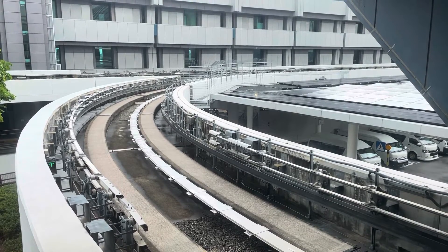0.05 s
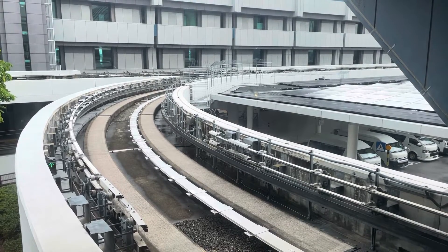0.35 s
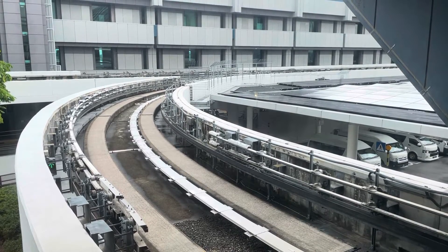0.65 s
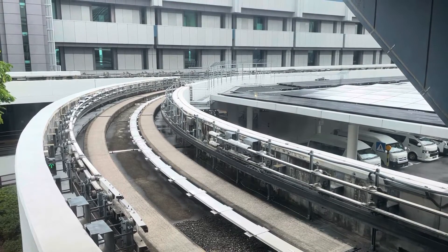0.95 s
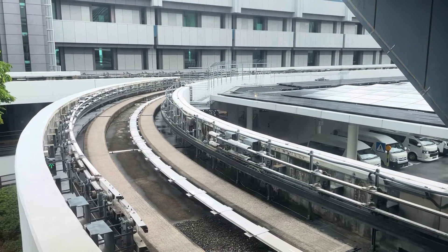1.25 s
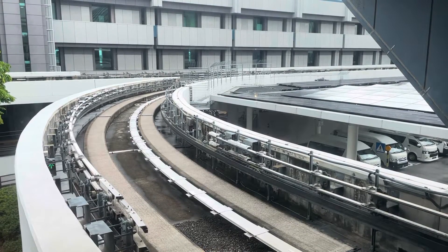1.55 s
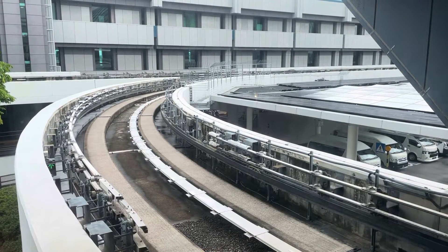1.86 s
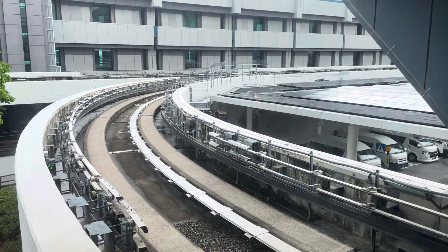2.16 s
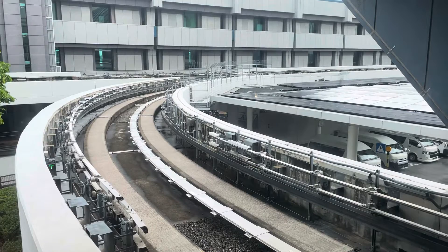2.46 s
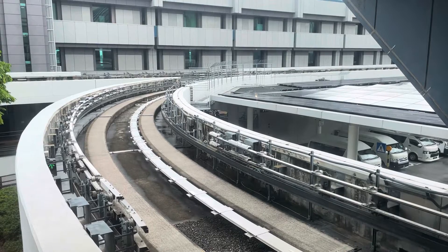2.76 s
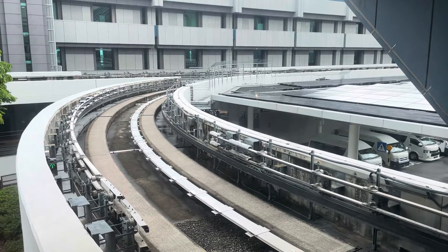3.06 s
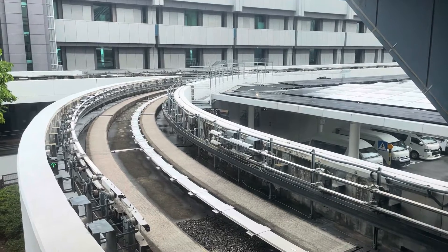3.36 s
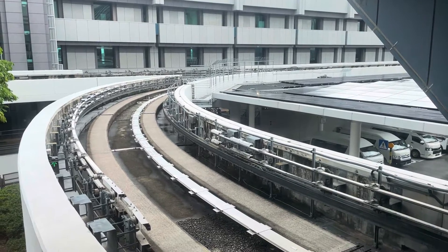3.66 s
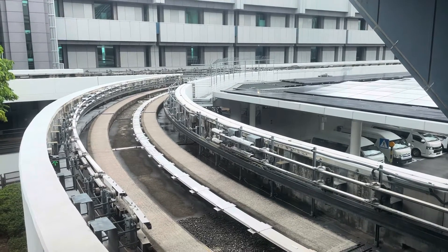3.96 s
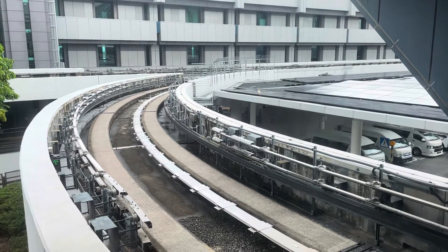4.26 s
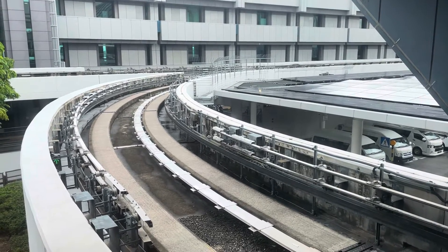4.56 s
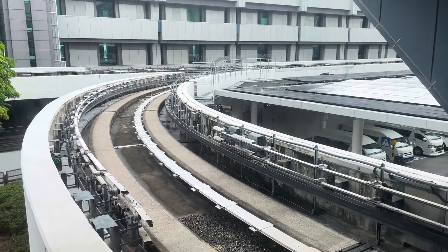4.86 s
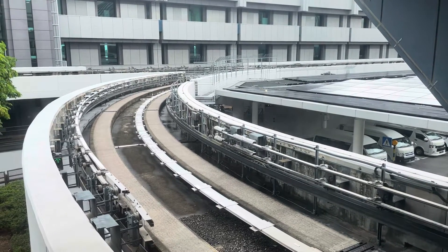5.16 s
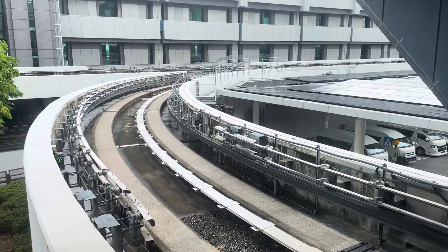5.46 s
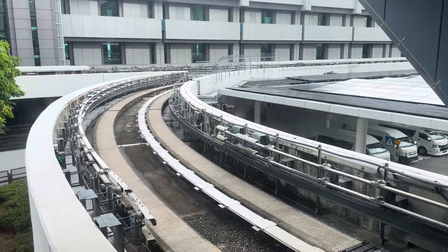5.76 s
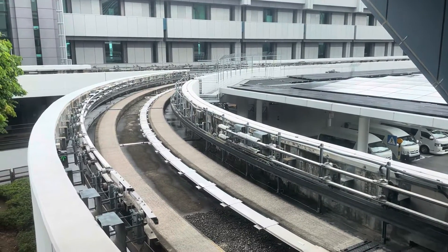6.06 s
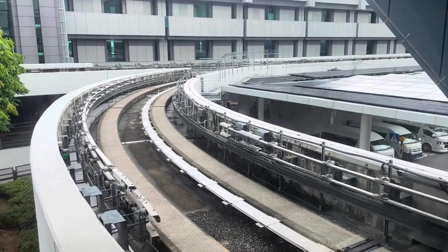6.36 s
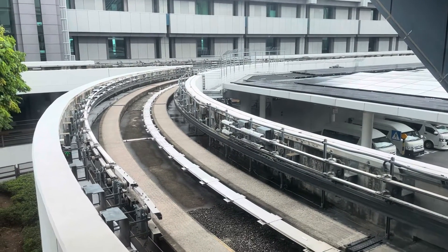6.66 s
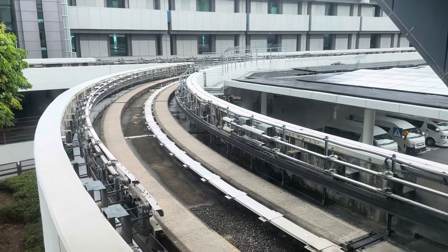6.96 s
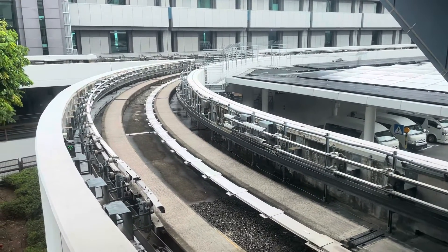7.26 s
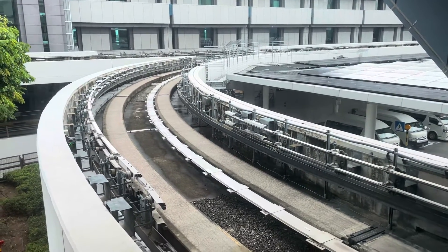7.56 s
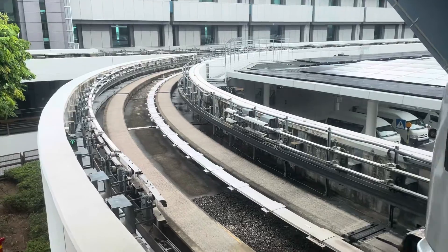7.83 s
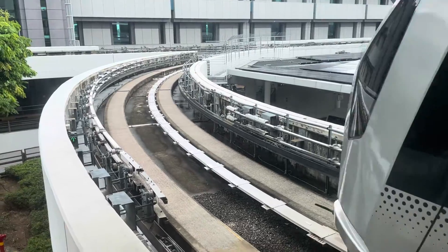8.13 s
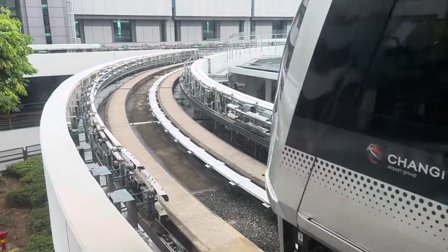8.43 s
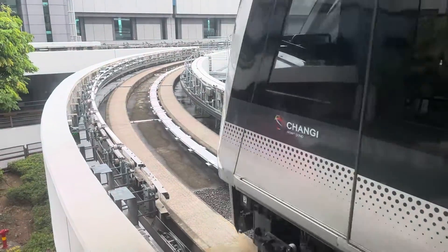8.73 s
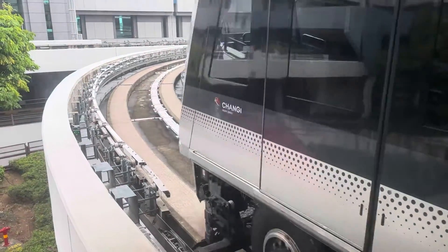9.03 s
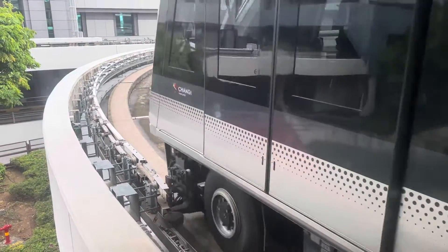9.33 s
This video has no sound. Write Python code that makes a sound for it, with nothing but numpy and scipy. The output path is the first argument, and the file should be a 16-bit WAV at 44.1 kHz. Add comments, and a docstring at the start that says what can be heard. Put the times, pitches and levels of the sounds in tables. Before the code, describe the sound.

Station fans rumble throughout outdoors, with a slowly swelling low hum, soft far traffic and a very faint, thin electric whistle. At about 0.2 seconds a distant valve gives a short, slightly whistling puff of air. A longer hiss of compressed air starts near 2.9 seconds, sags and fades by 5. A few tiny ticks sound nearby at 4.7. From about 5 seconds a rubber-tyred shuttle train approaches: its tyres roar on concrete, its gears give a throbbing mid-pitched whine, and its motor hums in surges, strongest around 7. From about 7 seconds its power pickups rub along the rails with a growing dry sizzle and thin, high ringing squeals. From 8 seconds the train passes close, the deck booming and the axles thrumming in low pulses, and it is still rolling by at the end, near 9.4 seconds.

```python
"""A rubber-tyred shuttle train rolls in along a curved concrete track and passes close by.
As it nears, its tyres roar, the deck booms under its weight, its gears whine, its motor hums,
and its collector shoes (the pads that pick up power) rub and sing on the power rails.
Before that, compressed air is let off twice in the distance, and a few tiny ticks sound nearby.
Station fans rumble throughout, with a low hum, a thin electric whistle and far traffic."""
import sys
import numpy as np
from scipy import signal
from scipy.fft import irfft, next_fast_len
from scipy.io import wavfile

SR = 44100
rng = np.random.default_rng(int(sys.argv[2]) if len(sys.argv) > 2 else 0)


def waveform_to_disk(signal):
    """Save audio, clipped to [-1, 1], as 16-bit WAV at the path in sys.argv[1]."""
    frames = np.transpose(np.atleast_2d(signal))
    scaled = np.clip(frames, -1, 1) * 32767
    samples = np.round(scaled).astype(np.int16)
    wavfile.write(sys.argv[1], SR, samples)


N = 414231
TIME = np.arange(N) / SR
TOP_HZ = 13800  # the sound is cut off above this

# A spectrum says how strong low and high pitches are compared with each other.
# A swell is strongest at peak_s and is down to about a third half_s before and after.
# the car's approach, and how it comes out from behind a building
SPEED_M_PER_S, CLOSEST_M = 4.45, 6.7
HIDDEN_DB, EMERGE_S, EMERGE_SPREAD_S = -35, 4.73, 0.22
# tyres on concrete: pitch_hz, strength_db
TYRE_SPECTRUM = [(150, -1), (400, -9), (720, 1), (1000, -3), (1400, -4), (1750, -10), (2500, -11),
                 (4000, -29), (6000, -43), (8000, -53), (9700, -35), (13500, -58.5)]
# the deck booming under the car's weight: pitch_hz, strength_db
DECK_SPECTRUM = [(15, -34.5), (30, -17), (45, -8), (58, 0.5), (70, 6.5), (85, -0.5), (125, -3), (190, -1.5),
                 (300, -31), (3000, -100)]
# tyres and body thrumming as the nose and axles arrive: peak_s, half_s, pitch_hz, level_db
AXLE_THRUMS = [(8.177, 0.11, 133.1, -30.5), (8.338, 0.17, 101, -29), (8.451, .07, 51, -26.5),
               (8.464, 0.071, 149.2, -30.5), (8.662, 0.064, 51, -25), (8.819, 0.047, 129.2, -25.5),
               (8.968, .12, 59.7, -24.5), (9.208, 0.065, 62, -26)]

# the note of the gears: time_s, pitch_hz
GEAR_PITCH = [(0, 869), (6, 859.5), (7, 856.3), (8, 858.3), (8.7, 859.5), (9.39, 849)]
# uneven throbs in the gear whine: peak_s, half_s, pitch_hz, strength_db
GEAR_THROBS = [(5.34, 0.043, 862, -53.5), (6.02, 0.053, 858, -48.5), (6.18, .04, 858, -46),
               (6.36, 0.08, 858, -41), (6.48, 0.047, 862, -48.5), (6.697, 0.05, 860, -51.5),
               (6.953, 0.062, 850, -45.5), (7.174, 0.043, 859, -43), (7.33, 0.045, 862, -47),
               (7.445, .04, 862, -48.5), (7.596, 0.032, 860, -41), (7.802, 0.046, 860, -45),
               (8.143, 0.04, 862, -43.5), (8.32, 0.05, 853, -42.5), (8.474, 0.049, 843, -48),
               (8.826, 0.073, 853, -45), (9.1, .06, 848, -48.5), (9.35, 0.057, 845, -47)]
# the motor surging in the curve: peak_s, half_s, level_db
MOTOR_SURGES = [(5.66, .08, -39.5), (6.02, 0.085, -39.5), (6.28, .16, -40), (6.71, 0.11, -33),
                (7.14, 0.15, -35.5), (7.42, .07, -39), (7.66, 0.065, -40), (7.96, .08, -44)]
# drones of the drive: multiple_of_gear_pitch, width_hz, peak_s, half_s, level_db
DRIVE_DRONES = [(0.421, 16, 7.08, 0.11, -37), (0.417, 20, 6.56, 1, -42), (0.519, 90, 6.9, 1.1, -46),
                (0.574, 7.4, 6.11, 0.4, -46), (.685, 10, 7.4, .7, -50), (.81, 200, 7.33, 0.17, -39.5),
                (.855, 30, 8.5, 0.7, -49.5), (.99, 54, 9, 0.36, -48), (1.661, 39, 8.5, 1.5, -56),
                (1.83, 90, 7.15, 0.6, -51)]

# notes that the shoes ring in the rails: pitch_hz, width_hz, strength_db, db_per_contact_db
RAIL_NOTES = [(1956, 90, -9, 1.5), (2094, 130, -4.5, 3), (2886, 310, 1, 1.46), (3134, 280, 0, 2.5)]
# shoes squealing as they press harder: peak_s, half_s, pitch_hz, glide_hz_per_s, width_hz, level_db
SHOE_SQUEALS = [(6.87, .13, 2820, 2, 50, -56), (7.72, .2, 3070, -0.5, 171, -52),
                (8.17, .13, 2084, 0, 50, -51), (8.7, 0.14, 3060, -0.5, 260, -47),
                (8.723, 0.14, 1990, 152, 90, -52), (9.02, .14, 3050, -300, 129.3, -47),
                (9.18, .25, 2100, 170.5, 55, -50), (9.268, 0.18, 2870, -200, 100, -53)]
# dry sizzle of the shoes: pitch_hz, strength_db
SIZZLE_SPECTRUM = [(1500, -26.5), (3200, -2.5), (3900, 3.5), (4500, 4.5), (5400, -0.5), (7000, -7.5),
                   (9500, -21.5), (11500, -24.5), (13500, -31)]
# faint fizz as the car comes into the open: pitch_hz, strength_db
FIZZ_SPECTRUM = [(1500, -44.5), (7500, -13), (9300, 5.5), (10300, -6.5), (11500, -14), (13500, -19)]

# a valve's short puff of air, and its bright top: pitch_hz, strength_db
PUFF_SPECTRUM = [(500, 8), (950, 5.5), (1600, 6.5), (3000, 0), (4200, -1.5), (5100, -2), (5900, 3.5),
                 (6500, -2), (7300, -3.5), (8400, -21), (10500, -20), (14000, -40)]
PUFF_TOP_SPECTRUM = [(500, -63), (7500, -30), (9200, 4.5), (10000, -1), (11000, -2), (12000, -9),
                     (12900, -7), (14000, -15.5)]
# faint sliding whistles during the puff: start_s, length_s, start_hz, end_hz, level_db
PUFF_WHISTLES = [(0.206, 0.17, 1005, 824, -43.5), (0.261, 0.127, 1280, 1464, -51.5)]
# a pipe's long release of air, and its bright top: pitch_hz, strength_db
VENT_SPECTRUM = [(600, -5), (1100, 5.5), (1700, 1.5), (2400, -4.5), (3500, -11), (4100, -12), (5000, -13),
                 (6200, -23.5), (7400, -23.5), (9000, -45.5), (13700, -59)]
VENT_TOP_SPECTRUM = [(600, -61), (8000, -37), (9100, 1.5), (9600, 3.5), (10000, -0.5), (10700, -11.5),
                     (11800, -25), (13800, -21)]
# notes at which the pipe and its nozzle ring: pitch_hz, width_hz, boost_db
PIPE_NOTES = [(2910, 340, 6), (3560, 140, 4.6), (5070, 110, 5), (5950, 260, 5)]
NOZZLE_NOTES = [(12600, 220, 9), (13600, 300, 9)]
# small ticks nearby: start_s, peak_db, pitch_hz, width_hz, decay_s
NEARBY_TICKS = [(4.699, -44, 10200, 1700, 0.0011), (4.7, -56, 7100, 700, .001),
                (4.7, -57, 13200, 1400, .001), (4.703, -60, 10200, 2000, 0.015),
                (4.707, -38, 2450, 600, 0.0012), (4.755, -44, 2250, 400, .003),
                (4.756, -62, 11000, 2400, .002)]

# rumble of the station's fans: pitch_hz, strength_db
RUMBLE_SPECTRUM = [(15, -25), (28, -15), (38, -13), (48, -3), (70, -5), (100, 1), (150, 1), (175, -1),
                   (250, -5.5), (340, -8.5), (430, -18), (700, -58), (4000, -100)]
# notes at which their ducts ring: pitch_hz, width_hz, boost_db
DUCT_NOTES = [(96.3, 4.4, 5), (114.5, 5.7, 5), (132.9, 5.3, 8.35), (141, 4, 1.8), (211.3, 21, 6.7),
              (243.3, 11, 2.8), (337.7, 9, 3.8)]
# low booms that swell up now and then in the rumble: pitch_hz, width_hz, peak_s, half_s, level_db
LOW_SWELLS = [(125.2, 45, 0.35, 0.18, -25), (213, 26, 1.01, 0.55, -31), (137.6, 7.1, 1.82, 0.11, -29),
              (215.4, 20, 2.386, 0.41, -32), (55, 29, 2, 0.57, -40), (133.5, 3.9, 4.305, 0.27, -24),
              (134.4, 10, 5.05, 0.46, -27), (213, 24.2, 4.8, .55, -33), (212, 13, 7.95, 0.26, -36),
              (191.8, 13, 8.7, .5, -35.5)]
# notes of a low hum: pitch_hz, base_db, waver_share, right_lag_rad, swell_share
HUM_TONES = [(48.9, -50.5, 0.4, 0.13, 1), (151.35, -32, 0.066, -0.04, 1), (213.2, -43, 0.6, -0.05, 1.28),
             (304.3, -38, 0.21, -0.11, 0.44), (489, -62, 0.73, -0.34, 1)]
# the hum swells slowly, dips as the car nears and returns as it passes: time_s, change_db
HUM_SWELL = [(0, -9), (.2, 4.5), (1, 4), (1.7, 1), (2.5, 6), (3, 1.5), (3.6, 3), (5, 5), (5.7, 2.5),
             (6.55, 3.5), (7.1, -8), (7.5, -9), (8.2, -9), (8.45, -1), (9.1, -1.5), (9.39, 4)]
# loudness of each tone of the electric whistle: time_s, level_db
WHISTLE_LEVEL = [(0, -74), (1.2, -73.5), (2.3, -72), (3, -74), (4.1, -74), (4.8, -76.5), (6, -72.5),
                 (7, -77), (9.39, -75)]
# far traffic and ventilation: pitch_hz, strength_db
TRAFFIC_SPECTRUM = [(40, -31.5), (150, -8.5), (420, 0), (700, 0.5), (1000, -4), (1400, -10), (2000, -16),
                    (3000, -20), (4000, -28), (6000, -33), (7500, -39.5), (9000, -51.5), (10500, -45),
                    (13500, -59)]

# how alike left and right sound: pitch_hz, likeness_share
STEREO_LIKENESS = [(45, .99), (70, .88), (100, .84), (160, .95), (280, .8), (450, .6), (650, .36),
                   (1300, .12), (2000, .35), (2900, .6), (4200, .52), (6100, .7), (8200, .9), (10500, .5),
                   (13000, .2)]
# how far the right side's wave trails the left's: pitch_hz, right_lag_rad
STEREO_LAG = [(130, 0), (340, -.1), (600, -.6), (950, -1.7), (1450, -.4), (2840, .55), (4100, 0),
              (5000, .5), (6700, -.7), (7700, -3), (8800, -3.2), (10400, -6.2)]
# how much louder the left side is: pitch_hz, left_db
STEREO_BALANCE = [(60, -.8), (110, -1), (200, .5), (360, 2.6), (600, 1.2), (850, 3), (1200, .2), (2100, .7),
                  (3100, 3.2), (4200, 2.4), (7000, .4), (13000, 0)]


def rolling():
    """Tyres roar over uneven concrete; the deck booms, and the car thrums as its axles arrive."""
    tyres = noise(TYRE_SPECTRUM) * flutter(rate_hz=11, depth_db=1)
    tyres *= gain_of(approach_db(alongside_s=7.66, db=-40, growth=1.5))
    deck = noise(DECK_SPECTRUM) * gain_of(approach_db(alongside_s=9.5, db=-33, growth=1.5))
    thrums = sum(tone(hz, (1 + 0.16 * drift(10)) * gain_of(db) * swell(peak_s, half_s))
                 for peak_s, half_s, hz, db in AXLE_THRUMS)
    return tyres + deck + thrums


def approach_db(alongside_s, db, growth):
    """A car part's level: hidden at first, rising as it nears, held at db once it is alongside."""
    distance_m = np.hypot(CLOSEST_M, SPEED_M_PER_S * np.maximum(alongside_s - TIME, 0))
    hidden = 0.5 - 0.5 * np.tanh((TIME - EMERGE_S) / (2 * EMERGE_SPREAD_S))
    return db + growth * 20 * np.log10(CLOSEST_M / distance_m) + HIDDEN_DB * hidden


def gears(echo_share=0.82):
    """Meshing gear teeth whine and throb, sinking a little in pitch; echoes make the note waver."""
    pitch_hz = curve(GEAR_PITCH)
    nearness = gain_of(approach_db(alongside_s=6.4, db=-51.5, growth=2.8))
    strength = nearness * np.sqrt(1 - echo_share ** 2)
    weighted_hz = strength * pitch_hz
    # each throb makes the whine louder and pulls it towards its own pitch
    for peak_s, half_s, hz, db in GEAR_THROBS:
        throb = gain_of(db) * swell(peak_s, half_s)
        strength += throb
        weighted_hz += throb * hz
    direct = strength * tone(weighted_hz / strength, 0.9 + 0.42 * drift(30), lag_rad=-1.35, left_db=5)
    # echoes of a moving car come back slightly shifted in pitch
    echoes = sum(tone(pitch_hz, drift(26), lag_rad, left_db=3) for lag_rad in (0, np.pi))
    return np.sqrt(2) * direct + echo_share * nearness * echoes


def motor():
    """The motor hums in surges while drones of the drive come and go; all follow the gears' pitch."""
    gear_hz = curve(GEAR_PITCH)
    load = sum(gain_of(db) * swell(peak_s, half_s) for peak_s, half_s, db in MOTOR_SURGES)
    hum = load * tone(0.443 * gear_hz, 1 + 0.42 * drift(22), lag_rad=-0.2, left_db=2.5)
    return hum + sum(drone(gear_hz * multiple, *row, left_db=9) for multiple, *row in DRIVE_DRONES)


def collector_shoes():
    """Shoes rub along the power rails, making them ring, sizzle, squeal and faintly fizz."""
    contact_db = approach_db(alongside_s=9.65, db=0.8, growth=0.53)
    ringing = sum(ring(hz, width_hz) * gain_of(db + growth * contact_db - 48.6)
                  for hz, width_hz, db, growth in RAIL_NOTES)
    scrape_db = 4 * swell(peak_s=9.105, half_s=0.04)  # crossing a rail joint
    sizzle = noise(SIZZLE_SPECTRUM) * gain_of(contact_db + scrape_db - 60)
    sizzle *= flutter(rate_hz=20, depth_db=1.2)
    squeals = np.zeros((2, N))
    for peak_s, half_s, hz, glide_hz_per_s, width_hz, db in SHOE_SQUEALS:
        slide_hz = glide_hz_per_s * np.clip(TIME - peak_s, -2 * half_s, 2 * half_s)
        squeals += drone(hz + slide_hz, width_hz, peak_s, half_s, db, left_db=1)
    fizz = noise(FIZZ_SPECTRUM) * gain_of(-72) * swell(peak_s=5.42, half_s=0.44)
    return ringing + sizzle + squeals + fizz


def air_puff():
    """A valve lets out one short hiss; its bright top starts and dies sooner."""
    body = valve(start_s=0.226, rise_s=0.034, open_s=0.2, db=-43.5, sag_db_per_s=31.5, fade_db_per_s=44.5)
    top = valve(start_s=0.21, rise_s=0.05, open_s=0.2, db=-54.5, sag_db_per_s=37.5, fade_db_per_s=88)
    return body * noise(PUFF_SPECTRUM) + top * noise(PUFF_TOP_SPECTRUM)


def puff_whistles():
    """Short airy whistles slide in pitch during the puff."""
    out = np.zeros((2, N))
    for start_s, length_s, start_hz, end_hz, db in PUFF_WHISTLES:
        progress = np.clip((TIME - start_s) / length_s, 0, 1)
        hz = start_hz + (end_hz - start_hz) * progress
        whistle = tone(hz, 0.8 + 0.8 * drift(45), lag_rad=-0.89, left_db=2)
        out += gain_of(db) * np.sin(np.pi * progress) * whistle
    return out


def air_vent():
    """Air blows out of a pipe for over a second; the pipe's main note rings early on."""
    body = valve(start_s=2.876, rise_s=0.33, open_s=1.7, db=-40.5, sag_db_per_s=9, fade_db_per_s=36)
    top = valve(start_s=2.82, rise_s=0.25, open_s=1.35, db=-60, sag_db_per_s=7.5, fade_db_per_s=39)
    note = valve(start_s=2.905, rise_s=0.09, open_s=0.33, db=-56, sag_db_per_s=2.5, fade_db_per_s=21.5)
    hiss = body * noise(VENT_SPECTRUM, PIPE_NOTES) + top * noise(VENT_TOP_SPECTRUM, NOZZLE_NOTES)
    return (hiss + note * ring(pitch_hz=2920, width_hz=330)) * flutter(rate_hz=11, depth_db=1)


def valve(start_s, rise_s, open_s, db, sag_db_per_s, fade_db_per_s):
    """An air jet's loudness: it rises, sags as the pressure drops, and fades once the valve shuts."""
    age_s = np.maximum(TIME - start_s, 0)
    fall_db = sag_db_per_s * np.minimum(age_s, open_s) + fade_db_per_s * np.maximum(age_s - open_s, 0)
    return np.minimum(age_s / rise_s, 1) * gain_of(db - fall_db)


def ticks():
    """Each tick is a burst of noise around one pitch that dies within milliseconds."""
    out = np.zeros((2, N))
    age_s = np.arange(SR // 20) / SR
    for start_s, db, hz, width_hz, decay_s in NEARBY_TICKS:
        band = signal.butter(2, [hz - width_hz / 2, hz + width_hz / 2], "band", fs=SR, output="sos")
        burst = signal.sosfilt(band, rng.standard_normal(len(age_s)) * np.exp(-age_s / decay_s))
        start = round(start_s * SR)
        out[:, start:start + len(burst)] += gain_of(db) * burst / abs(burst).max()
    return out


def rumble():
    """Station fans rumble through their ducts; low booms swell up now and then."""
    dip_db = swell(peak_s=7.3, half_s=0.49)  # the rumble dips slightly as the car nears
    fans = noise(RUMBLE_SPECTRUM, DUCT_NOTES) * gain_of(-27.5 - dip_db)
    return fans + sum(drone(*row, left_db=-1) for row in LOW_SWELLS)


def low_hum():
    """A hum of a few wavering notes swells slowly, dips as the car nears and returns as it passes."""
    swell_db = curve(HUM_SWELL)
    hum = np.zeros((2, N))
    for hz, db, waver, lag_rad, share in HUM_TONES:
        wavering = unit_level(1 + waver * drift(2.1))
        hum += gain_of(db + share * swell_db) * tone(hz, wavering, lag_rad, left_db=0.5)
    return hum


def electric_whistle(switch_hz=4500, mains_hz=50):
    """An inverter switches power very fast: a thin tone, with one more just below and just above."""
    pitches_hz = (switch_hz - 2 * mains_hz, switch_hz, switch_hz + 2 * mains_hz)
    whistle = sum(tone(hz, 1 + 0.48 * drift(2.7), left_db=5) for hz in pitches_hz)
    return whistle * gain_of(curve(WHISTLE_LEVEL))


def far_traffic():
    """Distant traffic and ventilation blur into a soft, nearly steady rush."""
    return gain_of(-39.5) * noise(TRAFFIC_SPECTRUM) * flutter(rate_hz=1.4, depth_db=0.5)


def noise(spectrum, notes=()):
    """Stereo noise shaped by a spectrum table and boosted around any ringing notes."""
    def strength_db(hz):
        boost_db = sum(db / (1 + (2 * (hz - pitch) / width) ** 2) for pitch, width, db in notes)
        return look_up(spectrum, hz) + boost_db
    return stereo_noise(strength_db)


def ring(pitch_hz, width_hz):
    """Noise ringing around one pitch."""
    return stereo_noise(lambda hz: -20 * np.log10(1 + ((hz - pitch_hz) / width_hz) ** 2))


def stereo_noise(strength_db):
    """Noise shaped by strength_db(hz); left and right are alike in the bass, less so higher up."""
    size = next_fast_len(N, True)
    hz = np.arange(0, TOP_HZ + 400, SR / size)
    left, unrelated = rng.standard_normal((2, len(hz), 2)) @ np.array([1, 1j])
    likeness = look_up(STEREO_LIKENESS, hz)
    right = likeness * left + np.sqrt(1 - likeness ** 2) * unrelated
    right *= np.exp(-1j * look_up(STEREO_LAG, hz))
    balance = gain_of(look_up(STEREO_BALANCE, hz) / 2)
    spectra = np.array([left * balance, right / balance]) * gain_of(strength_db(hz))
    return unit_level(irfft(spectra, size)[:, :N])


def drone(hz, width_hz, peak_s, half_s, db, left_db):
    """A rough note that swells and fades."""
    strength = gain_of(db) * swell(peak_s, half_s) * drift(width_hz / 2)
    return tone(hz, strength, look_up(STEREO_LAG, np.mean(hz)), left_db)


def tone(hz, strength, lag_rad=0, left_db=0):
    """A stereo sine wave whose size and phase follow strength; the right side trails by lag_rad."""
    sounding = np.flatnonzero(abs(strength) >= abs(strength).max() / 1000)
    span = slice(sounding[0], sounding[-1] + 1)
    cycles = np.cumsum(np.broadcast_to(hz, N)[span]) / SR
    wave = strength[span] * np.exp(2j * np.pi * cycles)
    balance = gain_of(left_db / 2)
    out = np.zeros((2, N))
    out[0, span] = wave.real * balance
    out[1, span] = (wave * np.exp(-1j * lag_rad)).real / balance
    return out


def swell(peak_s, half_s):
    """A bell-shaped rise to one and fall back to zero."""
    span = slice(*np.searchsorted(TIME, [peak_s - 3 * half_s, peak_s + 3 * half_s]))
    out = np.zeros(N)
    out[span] = np.exp(-((TIME[span] - peak_s) / half_s) ** 2)
    return out


def flutter(rate_hz, depth_db):
    """A loudness that wavers at random."""
    return gain_of(depth_db * drift(rate_hz).real)


def drift(rate_hz):
    """A smooth random wander at about rate_hz; its complex numbers carry both size and phase."""
    size = 8192
    hz = np.fft.fftfreq(size, TIME[-1] / size)
    spectrum = np.fft.fft(rng.standard_normal((size, 2)) @ [1, 1j])
    wander = np.fft.ifft(spectrum / (1 + (hz / rate_hz) ** 4))
    return np.interp(TIME, np.linspace(0, TIME[-1], size), unit_level(wander))


def curve(rows):
    """Joins a table's points in time with straight lines."""
    return np.interp(TIME, *np.transpose(rows))


def look_up(rows, hz):
    """A table's value at any pitch, blending between rows on a musical (log) scale."""
    pitches_hz, values = np.transpose(rows)
    return np.interp(np.log(hz + 1), np.log(pitches_hz + 1), values)


def gain_of(db):
    """Turns decibels into a multiplier."""
    return 10 ** (np.asarray(db) / 20)


def unit_level(x):
    """Scales a signal to an average (rms) level of one."""
    return x / np.sqrt(np.mean(abs(x) ** 2) + 1e-30)


def scene():
    """The arriving car, the bursts of air and the ticks, over the station's steady sound."""
    car = rolling() + gears() + motor() + collector_shoes()
    air = air_puff() + puff_whistles() + air_vent()
    return car + air + ticks() + rumble() + low_hum() + electric_whistle() + far_traffic()


def record(dry):
    """Cuts off the highest treble, above TOP_HZ."""
    low_pass = signal.firwin(511, TOP_HZ, window=("kaiser", 9), fs=SR)
    return signal.oaconvolve(dry, low_pass[None], "same")


dry = scene()
out = record(dry)
waveform_to_disk(out)
```